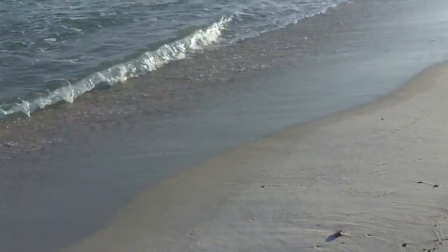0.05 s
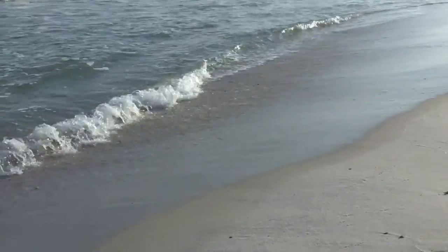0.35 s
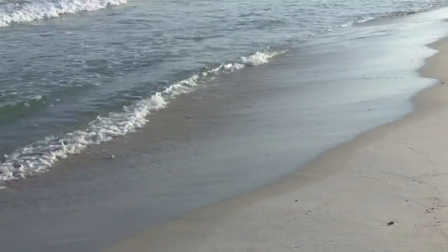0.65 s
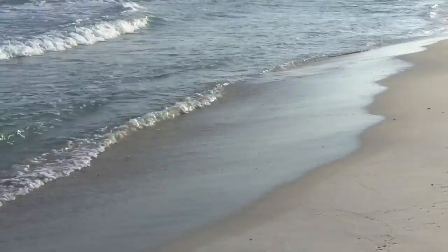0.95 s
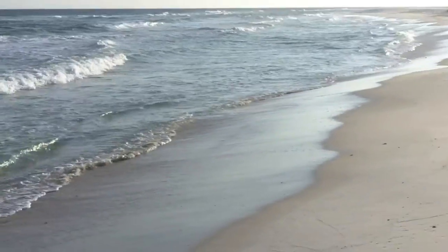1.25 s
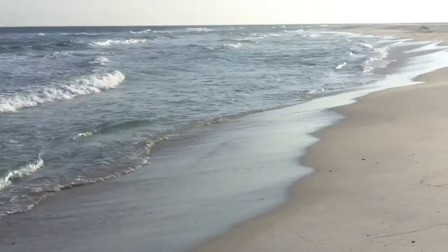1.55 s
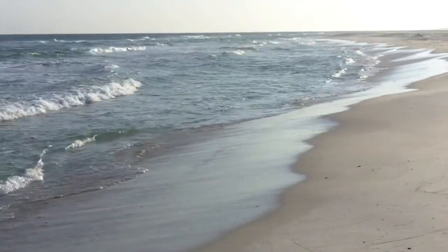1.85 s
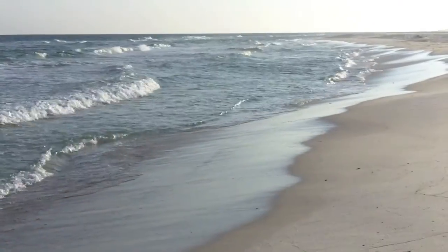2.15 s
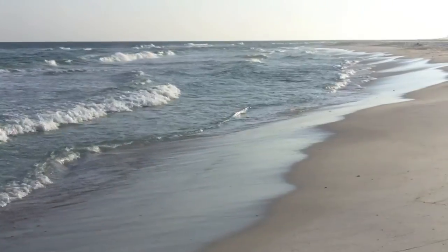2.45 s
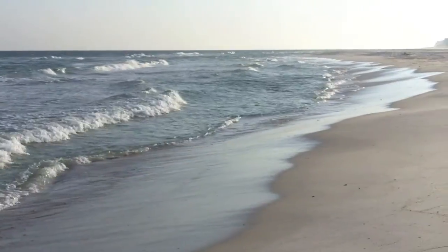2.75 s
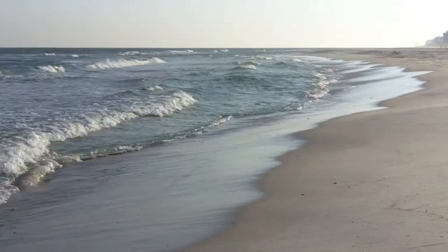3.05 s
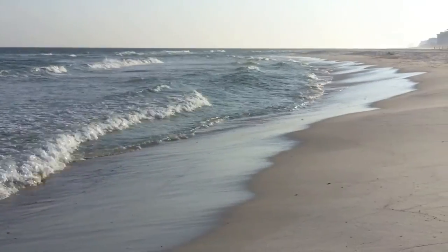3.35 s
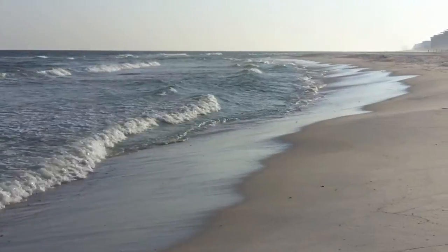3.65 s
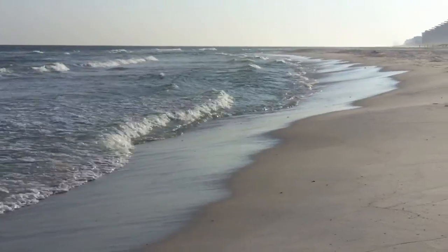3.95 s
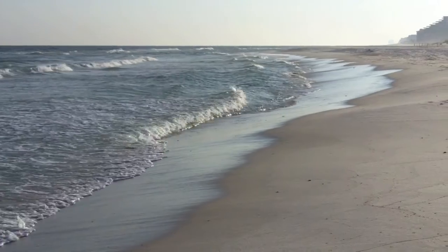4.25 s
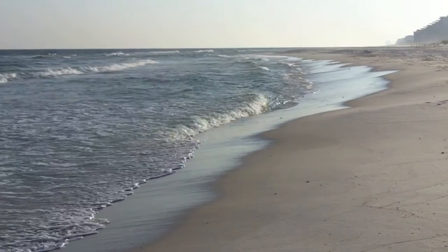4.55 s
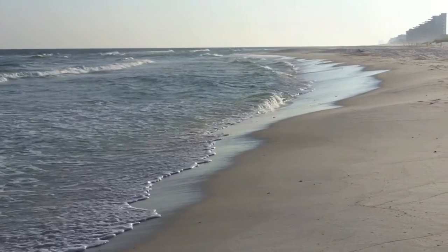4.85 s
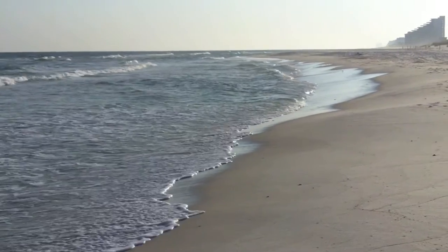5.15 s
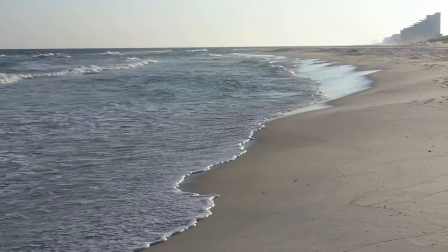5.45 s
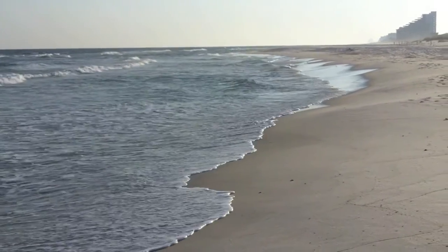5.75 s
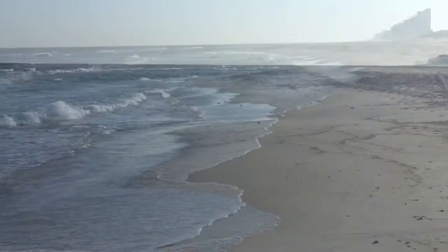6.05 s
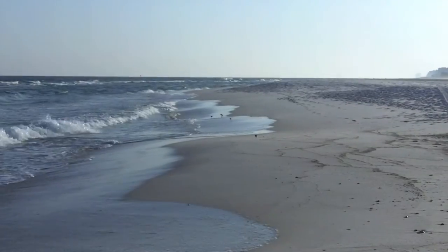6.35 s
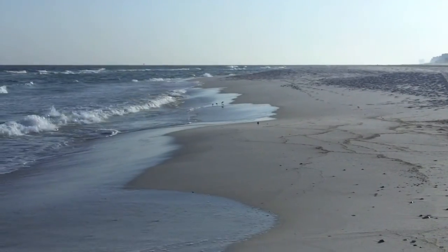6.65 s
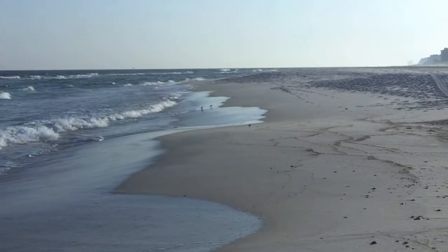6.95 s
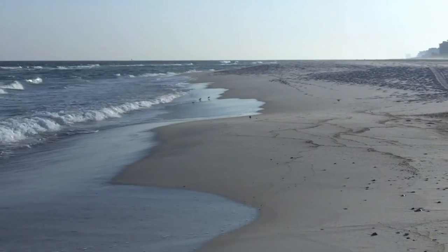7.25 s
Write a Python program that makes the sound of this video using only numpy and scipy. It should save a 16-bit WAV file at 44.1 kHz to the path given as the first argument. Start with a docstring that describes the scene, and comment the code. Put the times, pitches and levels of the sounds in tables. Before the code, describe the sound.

Small waves break on a sandy beach over a steady wash of surf. The first ones splash lightly, then fuller breakers roll in with a hollow roar and a few round slaps. Foam fizzes and water gurgles up the sand before more small waves follow. Throughout, a sea breeze rumbles and softly thumps on the hand-held microphone, with a faint low hum underneath.

```python
"""Small waves on a sandy shore.

Bubble clouds roar and ring hollowly in the breakers, crests splash and slap, foam fizzes,
and the swash gurgles up the sand. A sea breeze rumbles and thumps on one hand-held microphone,
which has a bright resonance and little top. A faint low hum wavers underneath."""
import sys
import numpy as np
from scipy import signal
from scipy.fft import rfft, irfft, next_fast_len
from scipy.io import wavfile
from scipy.ndimage import uniform_filter1d, map_coordinates

SR = 44100
rng = np.random.default_rng(int(sys.argv[2]) if len(sys.argv) > 2 else 0)


def store_wav(level_fs):
    """Save 16-bit WAV to argv[1]."""
    pcm = np.round(np.clip(np.atleast_2d(level_fs), -1, 1) * 32767)
    wavfile.write(sys.argv[1], SR, pcm.T.astype(np.int16))


N = 325899


def undb(db):
    """Decibels to gain."""
    return 10 ** (np.asarray(db) / 20)


def unit(x):
    """Scale to rms 1."""
    return x / np.sqrt(np.mean(x ** 2))


def curve(points):
    """Interpolate (seconds, value) points to one value per sample."""
    times_s, values = np.transpose(points)
    return np.interp(np.arange(N) / SR, times_s, values)


def bell(peak_s, sigma_s):
    """Gaussian envelope, peak 1."""
    return np.exp(-((np.arange(N) / SR - peak_s) / sigma_s) ** 2 / 2)


def shaped(x, response):
    """Filter by response(Hz); ramped padding keeps the ends from clicking."""
    margin = SR // 8
    size = next_fast_len(N + 2 * margin)
    spectrum = rfft(np.pad(x, margin, mode="linear_ramp"), size)
    hz = np.arange(size // 2 + 1) * SR / size
    return irfft(spectrum * response(hz), size)[margin:margin + N]


def coloured(x, colour):
    """Filter by (Hz, dB) points and scale to rms 1."""
    hz, db = np.transpose(colour)
    return unit(shaped(x, lambda f: undb(np.interp(np.log(f + 1), np.log(hz), db, right=db[-1] - 21))))


def walk(rate_hz):
    """Random steps at rate_hz, smoothed twice, rms 1."""
    hold = int(SR / rate_hz)
    steps = np.repeat(rng.standard_normal(1000), hold)[:N]
    return unit(uniform_filter1d(uniform_filter1d(steps, hold), hold))


def sped(x, speed):
    """Shift a steady sound in pitch by a per-sample ratio."""
    return map_coordinates(x, [np.cumsum(speed)], order=3, mode="wrap")


def bubbles(low_hz, high_hz, per_s, cycles, spread_db):
    """Bubbles of 28 sizes pinch off at random; each rings down over some cycles, rising in pitch."""
    pitches_hz = np.geomspace(low_hz, high_hz, 28)
    per_size = int(per_s * N / SR / len(pitches_hz))
    out = np.zeros(N)
    for hz in pitches_hz:
        when, chance = rng.random((4000, 2))[:per_size].T
        gains = undb(spread_db * np.minimum(-np.log(1 - chance), 4))  # many weak, few strong
        signs = (-1) ** np.arange(len(gains))
        births = np.bincount((when * N).astype(int), gains * signs, N)
        age = np.arange(int(cycles * SR / hz)) * hz / SR / cycles  # 0 to 1
        ring = np.exp(-np.log(300) * age) * np.sin(2 * np.pi * cycles * age * (1 + 0.12 * age))
        out += hz * signal.oaconvolve(births, ring)[:N]
    return unit(out)


def water(colour, near_bubbles, near_db, churn_db, churn_hz):
    """Countless far bubbles merge into a rush, near ones stand out, and the whole churns unevenly."""
    rush = rng.standard_normal(N) + undb(near_db) * near_bubbles
    return coloured(rush, colour) * undb(churn_db * walk(churn_hz))


def swells():
    """Breakers build and die over the far wash. Returns roar, splash, fizz gains and a pitch ratio."""
    # Each row: peak, build-up and decay in seconds, roar, splash and fizz in dB, pitch shift in octaves.
    breakers = [(0.32, 0.12, 0.35, -42.5, -40.5, -40, 0.0084), (0.748, 0.16, 0.18, -41, -40, -41, 0.2),
                (1.02, .1, 0.49, -41.5, -39.5, -41, 0.25), (1.46, 0.3, 0.18, -43, -39, -40, .2),
                (2.48, 0.28, 0.22, -35.5, -38, -41, 0.046), (2.675, 0.11, 0.091, -34.5, -37.5, -35, 0.088),
                (3.22, 0.36, 0.26, -35.5, -39.5, -38.5, 0.099), (3.519, 0.21, 0.37, -33.5, -39, -37.5, .12),
                (3.82, 0.16, 0.22, -31.5, -35, -32.5, .05), (4.04, 0.076, 0.064, -32, -36.5, -35.5, 0.04),
                (4.18, 0.062, 0.086, -35.5, -37, -34, 0.074), (4.57, 0.7223, 0.21, -41.5, -46, -39.5, 0),
                (4.954, .33, 0.091, -36, -41.5, -39.5, -.1), (5.3, 0.3, 0.15, -37, -41.5, -42.5, -0.048),
                (5.82, .24, 0.1096, -36, -45, -47, -0.051), (6.36, .21, 0.25, -38.5, -39.5, -37, 0.048),
                (6.82, 0.28, 0.12, -37, -39.5, -37.5, -0.026),
                (7.32, 0.19, 0.17, -38.5, -45.5, -43, -0.0099)]
    # Wash of the far shore. Each row: time in seconds, base level in dB.
    wash_levels = [(0, -43), (1.9, -40.5), (4.4, -45), (5.25, -45.5), (5.55, -46.5), (6.1, -42.5),
                   (7.05, -46.5), (7.39, -44.5)]
    wash_mix_db = [1.5, -0.5, -0.66]  # roar, splash, fizz
    crest_shape = 1.3  # 1 pointed, 2 round
    power = np.outer(undb(wash_mix_db), undb(curve(wash_levels))) ** 2
    weighted_oct = np.zeros(N)
    for peak_s, build_s, decay_s, *levels_db, shift_oct in breakers:
        age_s = np.arange(N) / SR - peak_s
        swell = np.exp(-np.maximum(-age_s / build_s, age_s / decay_s) ** crest_shape)
        breaker_power = np.outer(undb(levels_db), swell) ** 2
        power += breaker_power
        weighted_oct += shift_oct * breaker_power.sum(axis=0)  # the loudest breaker leads the pitch
    return np.sqrt(power), 2 ** (weighted_oct / power.sum(axis=0))


def surf():
    """Large bubbles roar, middling ones splash, tiny ones fizz."""
    # Spectra of the three bands. Each row: frequency in Hz, relative level in dB.
    roar_colour = [(70, -35), (130, -0.5), (210, 0.5), (320, -3), (520, -1.5), (720, -5.5), (930, -6),
                   (1350, -17), (3000, -26)]
    splash_colour = [(350, -10), (700, -5), (1000, -3), (1350, -3), (1950, -7), (2600, -13.5), (4000, -23),
                     (8000, -46)]
    fizz_colour = [(1000, 0.5), (2200, 1.5), (3200, -1), (4400, -3), (5000, -4.5), (5500, -5), (7000, -0.6),
                   (9200, -4), (12000, -19.5), (15000, -37)]
    (roar_gain, splash_gain, fizz_gain), pitch = swells()
    large = bubbles(204.4, 1100, per_s=350, cycles=7.3, spread_db=1.0)
    roar = water(roar_colour, large, near_db=-14, churn_db=0.77, churn_hz=11)
    middling = bubbles(737, 2980, per_s=1100, cycles=17, spread_db=1.0)
    splash = water(splash_colour, middling, near_db=-7, churn_db=1.04, churn_hz=23)
    tiny = bubbles(2420, 12800, per_s=4000, cycles=11.3, spread_db=2.5)
    fizz = water(fizz_colour, tiny, near_db=-8, churn_db=0.61, churn_hz=48)
    # Each breaker traps its own bubble size, so roar and splash shift together.
    waves = sped(roar, pitch) * roar_gain + sped(splash, pitch) * splash_gain + fizz * fizz_gain
    collapse_db = -0.36 * walk(rate_hz=25)  # crests fall piece by piece, shaking all bands
    return waves * undb(collapse_db)


def slaps():
    """A plunging crest traps a burst of large bubbles: a round slap with little hiss."""
    # Each row: peak in seconds, level in dB, Gaussian sigma in seconds.
    plunges = [(0.32, -40, .012), (0.356, -34, 0.024), (0.542, -35, 0.031), (2.688, -38, 0.041),
               (3.83, -30.5, .022), (4.171, -39, .016), (6.348, -41.5, 0.03), (6.828, -40, 0.031)]
    # Each row: frequency in Hz, relative level in dB.
    slap_colour = [(120, -7), (250, 0), (850, -2.5), (1400, -8), (2600, -14.5), (4500, -22), (8000, -36)]
    envelope = sum(undb(db) * bell(peak_s, sigma_s) for peak_s, db, sigma_s in plunges)
    rush = rng.standard_normal(N) + bubbles(360, 3300, per_s=900, cycles=13, spread_db=2.5)
    return envelope * coloured(rush, slap_colour)


def clouds():
    """Bubbles left by a breaker swing together as a cloud, with a hollow pitch that wanders a little."""
    # Each row: peak in seconds, Gaussian sigma in seconds, pitch in Hz, level in dB.
    bubble_clouds = [(0.5, 0.26, 205, -47), (1.247, 0.36, 1300, -44), (2.6, .2, 280, -42),
                     (2.663, 0.18, 719.8, -39.5), (2.67, 0.084, 1830, -40.5), (3.45, .35, 225, -41.5),
                     (3.55, 0.33, 556, -41.5), (3.75, 0.41, 830, -37.5), (5.15, 0.34, 989.5, -45),
                     (6.58, .27, 450.2, -41)]
    width_oct, wander_oct = 0.29, 0.06
    out = np.zeros(N)
    for peak_s, sigma_s, hz, db in bubble_clouds:
        noise = rng.standard_normal(N)
        ringing = shaped(noise, lambda f: np.exp(-(np.log2((f + 1) / hz) / width_oct) ** 2 / 2))
        pitch = 2 ** (wander_oct * walk(rate_hz=3))
        out += unit(sped(ringing, pitch)) * undb(db) * bell(peak_s, sigma_s)
    return out


def swash():
    """A sheet of water tumbles up the sand with a low gurgle of big bubbles."""
    # Each row: time in seconds, level in dB.
    swash_levels = [(0, -63), (2.15, -53), (2.45, -35.5), (2.9, -43), (4.1, -41), (4.4, -49), (4.65, -37.5),
                    (5.35, -39), (5.85, -42.5), (6.15, -52), (7.39, -53)]
    # Each row: frequency in Hz, relative level in dB.
    gurgle_colour = [(80, -12), (160, -2.5), (260, -7), (400, -7), (800, -28), (2000, -40)]
    big = bubbles(136, 497, per_s=160, cycles=5.4, spread_db=1.0)
    gurgle = water(gurgle_colour, big, near_db=-8, churn_db=2.1, churn_hz=19)
    return gurgle * undb(curve(swash_levels))


def eddies(colour, steady_s):
    """Turbulent pressure, levelled to rms 1 over a window of steady_s."""
    pressure = coloured(rng.standard_normal(N), colour)
    return pressure / np.sqrt(uniform_filter1d(pressure ** 2, int(steady_s * SR)) + 1e-6)


def breeze():
    """Large eddies rumble on the microphone, small ones flutter, single ones strike as soft thumps."""
    # Breeze between gusts. Each row: time in seconds, rumble level in dB.
    lull_levels = [(0, -20), (0.5, -21.5), (0.85, -20), (1.5, -22), (1.63, -21.5), (1.75, -23), (1.9, -19),
                   (2.15, -20), (2.4, -22), (2.7, -21), (2.9, -24.5), (3.1, -22), (3.35, -20.5), (3.8, -24),
                   (4.2, -22.5), (4.45, -21), (4.85, -25.5), (5.1, -24.5), (5.95, -20), (6.12, -24),
                   (6.5, -20.5), (7.1, -21), (7.39, -20)]
    # Each row: peak in seconds, Gaussian sigma in seconds, rumble in dB, flutter in dB.
    gusts = [(0.24, 0.026, -19, -40), (0.685, 0.015, -25, -33), (0.784, 0.019, -13.5, -36),
             (1.09, 0.02, -22.5, -34), (1.223, 0.03, -19, -27.5), (1.347, 0.037, -21, -27),
             (1.508, 0.045, -18.5, -34), (1.735, 0.032, -15, -33.5), (2.069, 0.028, -24, -34),
             (2.768, 0.04, -13.5, -36), (3.03, 0.027, -17.5, -27), (3.491, 0.064, -25, -29),
             (4.071, 0.027, -21.5, -26), (4.659, 0.037, -18.5, -32.5), (5.01, 0.042, -16.5, -29),
             (5.151, 0.026, -15.5, -40), (5.328, 0.033, -16, -29.5), (5.44, 0.038, -14, -29),
             (5.681, 0.032, -22, -27), (5.846, 0.023, -15.5, -36), (5.929, 0.015, -18, -35),
             (6.31, 0.026, -21.5, -29), (6.43, 0.038, -17.5, -36), (6.56, 0.026, -25, -33),
             (6.66, 0.023, -25, -38), (6.861, 0.043, -18, -28.5), (6.971, .025, -13.5, -38),
             (7.31, .04, -21, -34)]
    # Single eddies. Each row: time in seconds, peak pressure in dB, Gaussian sigma in seconds.
    buffets = [(1.395, -14, 0.0027), (1.776, -10.5, 0.004), (1.945, -17, 0.0012), (2.087, -10, 0.00079),
               (2.988, -8, 0.0041), (4.094, -17.5, 0.0025), (4.652, -14.5, 0.004), (5.005, -17, 0.005),
               (5.289, -19, 0.0019), (5.419, -15, 0.003), (5.501, -11, .0035), (5.623, -12.5, 0.0029),
               (5.669, -16.5, .0013), (5.6765, -13, 0.0016), (5.707, -14, 0.0028), (6.406, -14, 0.0027),
               (6.842, -12, .003), (6.895, -11, 0.0038)]
    # Eddy spectra. Each row: frequency in Hz, relative level in dB.
    rumble_colour = [(4, -12.5), (10, 0), (22, -1.5), (35, -7.5), (58, -13.5), (80, -26.5), (160, -44),
                     (400, -67)]
    flutter_colour = [(30, -26), (65, -4), (95, -3), (130, -14), (180, -15.5), (250, -27), (400, -24.5),
                      (1200, -37)]
    lull_db = curve(lull_levels)
    rumble_gain, flutter_gain = undb(lull_db), undb(lull_db - 14.5)
    for peak_s, sigma_s, rumble_db, flutter_db in gusts:
        gust = bell(peak_s, sigma_s)
        rumble_gain = np.hypot(rumble_gain, undb(rumble_db) * gust)
        flutter_gain = np.hypot(flutter_gain, undb(flutter_db) * gust)
    out = eddies(rumble_colour, steady_s=0.121) * rumble_gain
    out += eddies(flutter_colour, steady_s=0.082) * flutter_gain
    for peak_s, db, sigma_s in buffets:
        offset = (np.arange(N) / SR - peak_s) / sigma_s
        out -= undb(db) * (1 - offset ** 2 / 2) * bell(peak_s, sigma_s)  # suction between two pushes
    return out


def hum(hz=101.5):
    """A faint low hum that wavers in level."""
    rms_db = -50 + 3.2 * walk(rate_hz=3.4)
    return undb(rms_db) * np.sqrt(2) * np.sin(2 * np.pi * hz * np.arange(N) / SR)


def scene():
    """All sources reach one microphone, so both channels are alike."""
    return np.tile(surf() + slaps() + swash() + breeze() + hum() + clouds(), (2, 1))


def record(dry):
    """The microphone rings in the treble, has a null above that, and cuts the top."""
    ring_hz, width_hz, null_hz, top_hz = 5484, 810, 7950, 14600

    def microphone(f):
        return (1 - (f / null_hz) ** 2) / (1 - (f / ring_hz) ** 2 + 1j * f * width_hz / ring_hz ** 2)

    heard = np.array([shaped(channel, microphone) for channel in dry])
    lowpass = signal.ellip(8, 0.2, 70, top_hz, fs=SR, output="sos")
    return signal.sosfilt(lowpass, heard)


dry = scene()
out = record(dry)
store_wav(out)
```